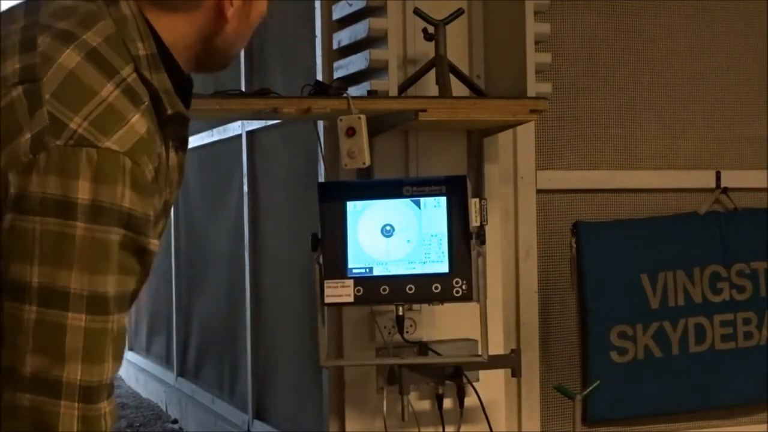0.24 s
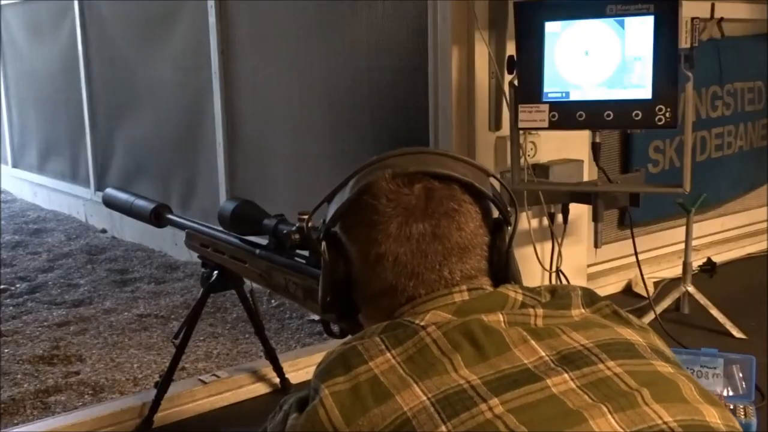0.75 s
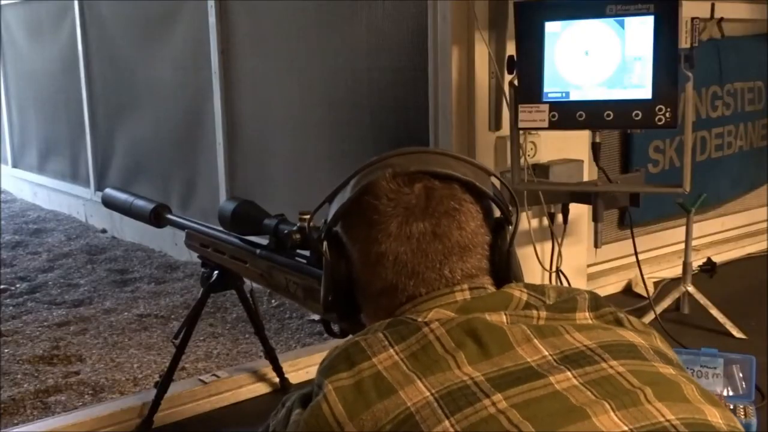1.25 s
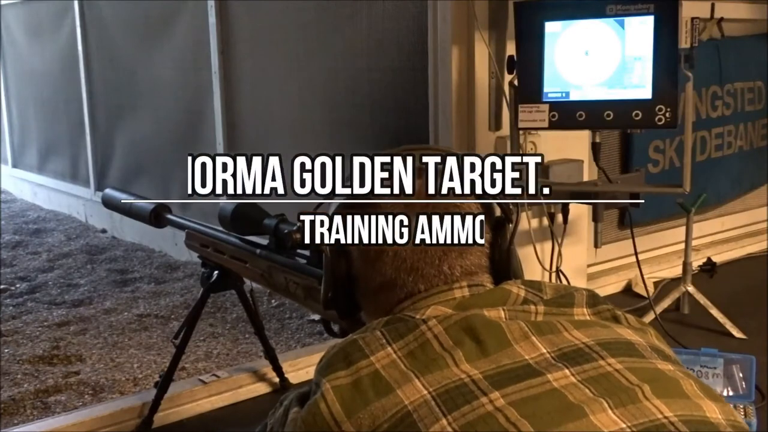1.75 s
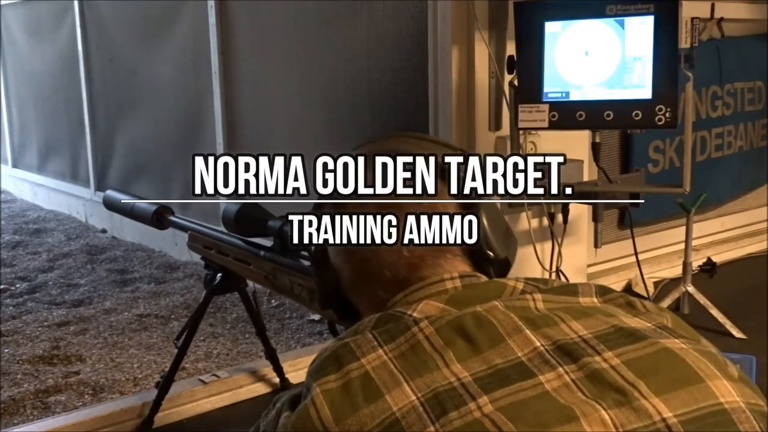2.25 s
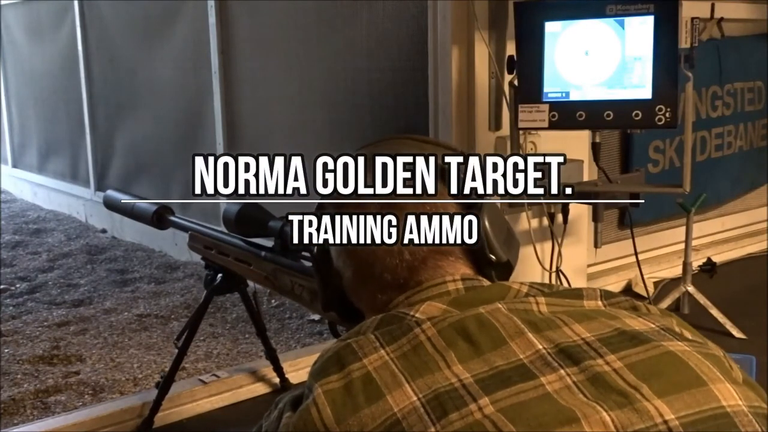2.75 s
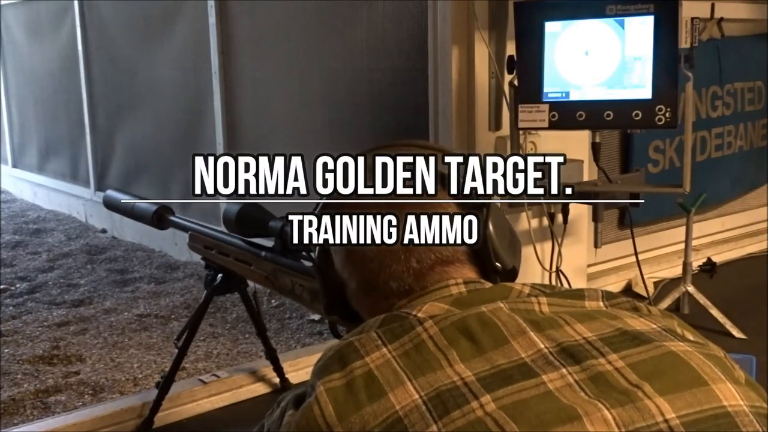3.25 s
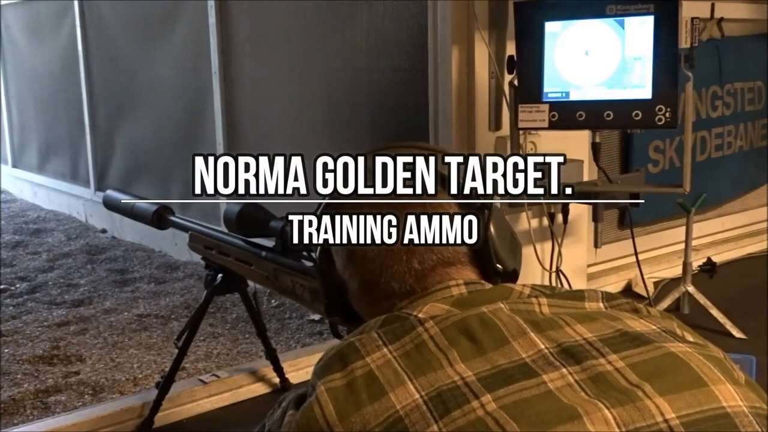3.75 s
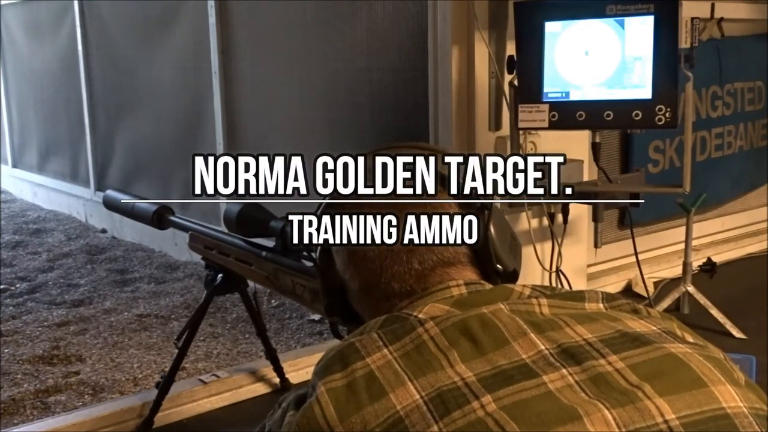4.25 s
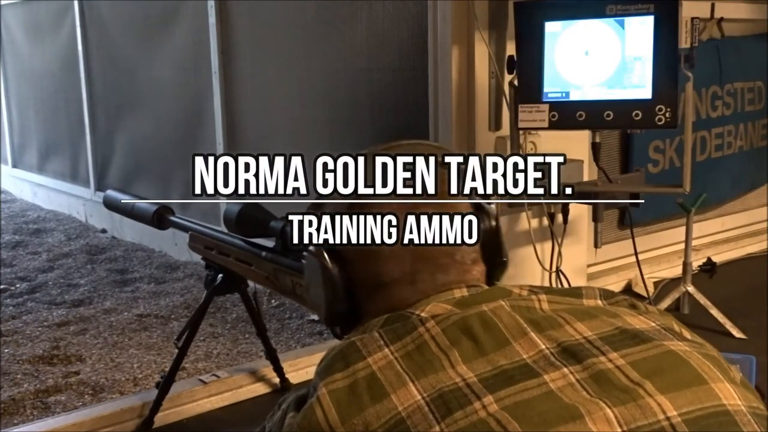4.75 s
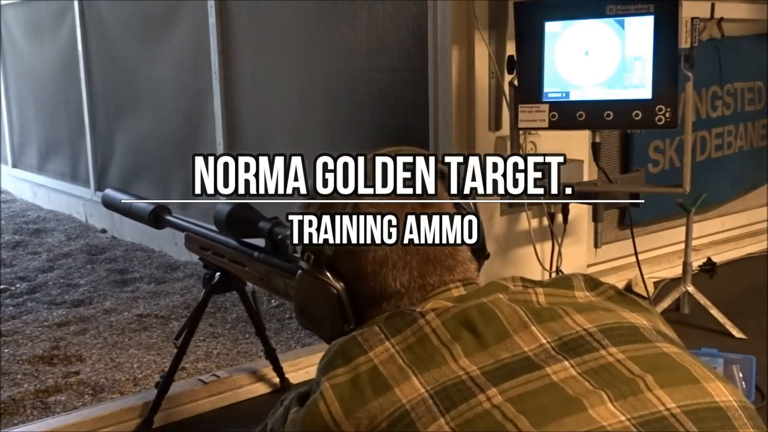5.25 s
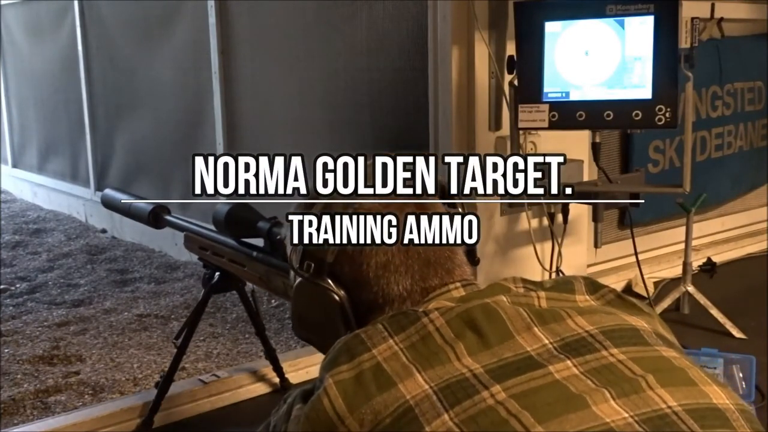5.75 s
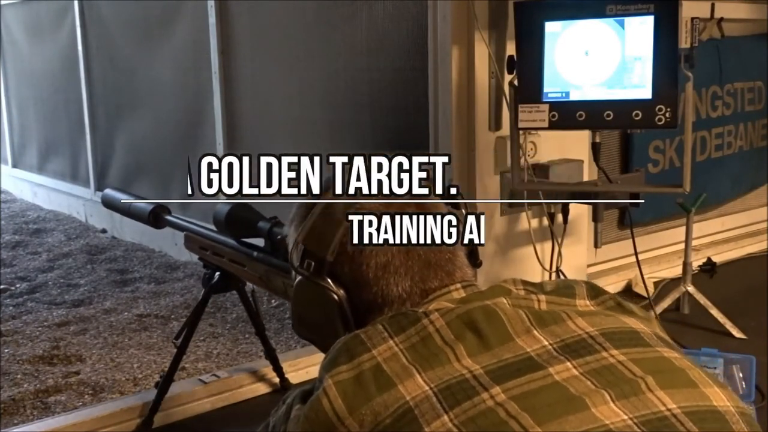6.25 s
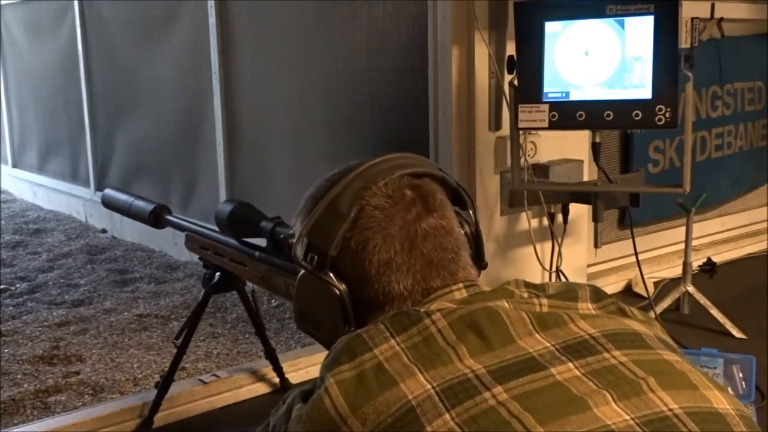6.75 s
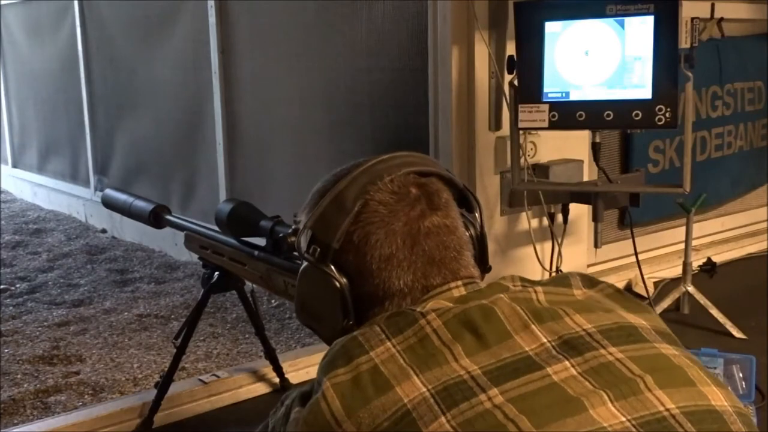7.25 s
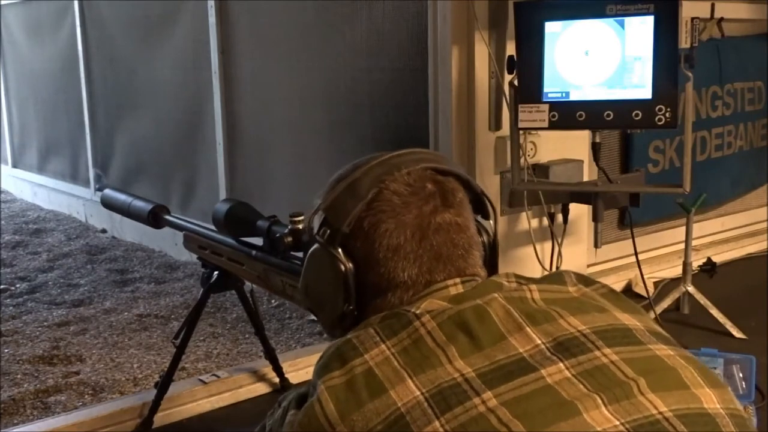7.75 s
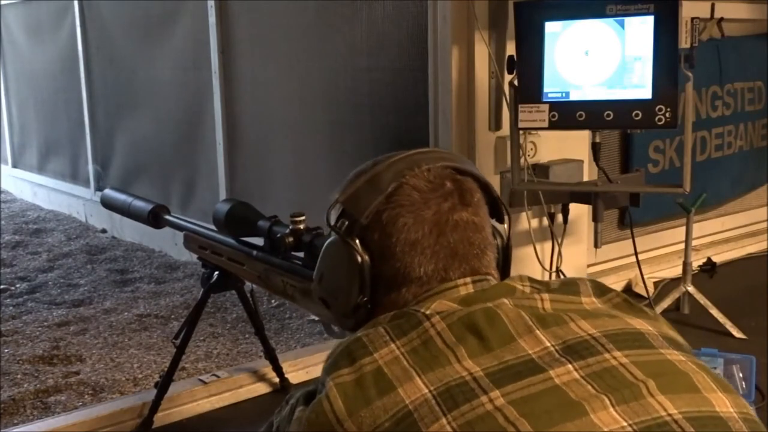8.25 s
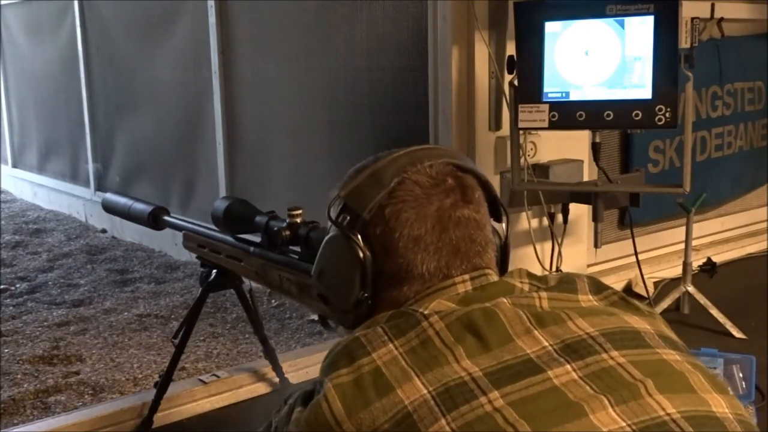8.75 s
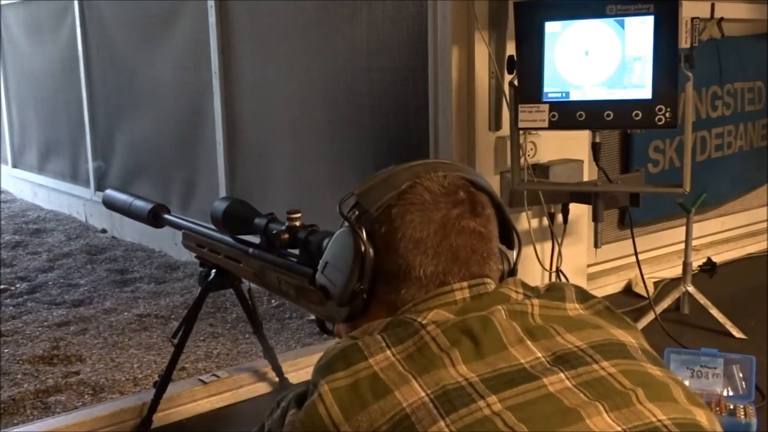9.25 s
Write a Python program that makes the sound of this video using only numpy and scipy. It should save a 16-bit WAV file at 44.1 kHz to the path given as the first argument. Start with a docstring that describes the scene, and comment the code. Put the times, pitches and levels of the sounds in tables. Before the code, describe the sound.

Sharp metallic clacks and short scrapes of a rifle bolt being closed, then opened and closed again, close up with faint clothing rustle.

```python
"""A shirt rustles over quiet room noise and a soft low flutter, 25 beats a second.
A prone shooter works a bolt-action rifle in a covered firing point, close to a camera. The bolt runs
home and locks; later it is lifted, drawn back with short hollow notes, pushed forward and locked again.
Contacts ring the steel, the stock and the air in the action; sliding friction scrapes and squeals.
On the first closing a brass cartridge rattles in and a jolted spring pings."""
import sys
import numpy as np
from scipy import signal
from scipy.fft import rfft, irfft, next_fast_len
from scipy.io import wavfile
from scipy.ndimage import uniform_filter1d, map_coordinates

SR = 44100
rng = np.random.default_rng(int(sys.argv[2]) if len(sys.argv) > 2 else 0)


def inscribe(sig):
    """Save sig as 16-bit PCM at rate SR to the path in sys.argv[1].

    A 1-D sig is mono; a 2-D sig holds one channel per row.
    Samples are clipped to [-1, 1] before scaling.
    """
    pcm = np.round(np.clip(np.atleast_2d(sig).T, -1, 1) * 32767)
    wavfile.write(sys.argv[1], SR, pcm.astype(np.int16))


N = 418509

# envelope of room noise and flutter: (time [s], level [dB])
BACKGROUND_LEVEL = [(0.0, -49.5), (0.33, -49.5), (0.42, -55), (1.25, -52.5), (1.5, -57.5), (2.9, -58),
                    (5.3, -52.5), (6.6, -50), (9.49, -51)]


def amp(db):
    """Decibels to gain."""
    return 10 ** (np.asarray(db) / 20)


def unit(x):
    """Scale to rms 1."""
    return x / np.sqrt(np.mean(x ** 2) + 1e-20)


def along(points, hz):
    """Interpolate (frequency [Hz], value) points on a log axis."""
    knots_hz, values = np.transpose(points)
    return np.interp(np.log(hz + 1), np.log(knots_hz + 1), values)


def envelope(points):
    """Gain per sample from (time [s], level [dB]) points."""
    return amp(np.interp(np.arange(N) / SR, *np.transpose(points)))


def movement(peak_s, rise_s, hold_s, db, fade_db_per_s, rise_db=29.5):
    """Gain of one movement: swell, hold, fade."""
    t = np.arange(N) / SR - peak_s
    swell_db = rise_db * np.minimum(t, 0) / max(rise_s, .001)
    fade_db = fade_db_per_s * np.maximum(t - hold_s, 0)
    return amp(db + np.maximum(swell_db - fade_db, -200))


def wobble(rate_hz):
    """Smooth random curve, rate_hz knots a second."""
    knots = rng.standard_normal(int(N * rate_hz / SR) + 4)
    return map_coordinates(knots, [np.arange(N) * rate_hz / SR])


def grit(size, spiky_db):
    """Noise broken into tiny contacts of uneven strength."""
    noise = rng.standard_normal(size)
    strength = unit(uniform_filter1d(rng.standard_normal(size), size=40))
    return unit(noise * amp(spiky_db * strength))


def filtered(x, response):
    """Apply response(hz) by FFT."""
    n = x.shape[-1]
    padded = 2 * next_fast_len(n // 2 + 2048)
    return irfft(rfft(x, padded) * response(np.fft.rfftfreq(padded, 1 / SR)), padded)[..., :n]


def causal(gain):
    """Minimum-phase response of this magnitude: rings only after a blow."""
    cepstrum = irfft(np.log(np.maximum(gain, 1e-6)))
    half = len(cepstrum) // 2
    cepstrum[1:half] *= 2
    cepstrum[half + 1:] = 0
    return np.exp(rfft(cepstrum))


def through(drive, colour):
    """Ring a body of magnitude response colour(hz); rms 1."""
    hz = np.fft.rfftfreq(8192, 1 / SR)
    return unit(signal.oaconvolve(drive, irfft(causal(colour(hz))))[:N])


def resonances(modes, hz):
    """Magnitude response of (centre [Hz], width [Hz], level [dB]) modes."""
    power = 0
    for centre_hz, width_hz, db in modes:
        peak = amp(2 * db) / (1 + ((hz - centre_hz) / (width_hz / 2)) ** 2)
        skirt = 1 / (1 + ((hz - centre_hz) / (centre_hz / 2)) ** 2)
        bass_cut = hz ** 2 / (hz ** 2 + (centre_hz / 2) ** 2)
        power += peak * skirt * bass_cut
    return np.sqrt(power)


def shirt(level_db=-1, fade_db_per_s=450):
    """Fibres rub as the shooter shifts."""
    # cloth movements: (time at full speed [s], rise [s], hold [s], level [dB])
    rustles = [(0.0, .01, 0.12, -43.5), (0.2, 0.08, 0.16, -53), (1.947, 0.27, 0.44, -54.5),
               (4.776, 0.33, .2, -52.5), (8.998, 0.69, 0.27, -54.5)]
    # rubbing cloth spectrum: (frequency [Hz], density [dB])
    cloth = [(290, -12), (500, 2), (835, 1), (1210, 1), (1850, -2.5), (3560, -6.5), (7160, -16.5),
             (8860, -20.5), (15000, -69)]
    rub = unit(filtered(grit(N, spiky_db=1), lambda hz: amp(along(cloth, hz))))
    return amp(level_db) * rub * sum(movement(*row, fade_db_per_s) for row in rustles)


def room_noise(level_db=2):
    """Room air, near mono in the bass and wide in the treble."""
    # air spectrum: (frequency [Hz], density [dB])
    spectrum = [(12, -40.5), (20, -13.5), (112, -5), (196, -3.5), (352, -10.5), (452, -13.5), (631, -12.5),
                (686, -14.5), (985, -17.5), (1100, -18.5), (1410, -21), (3000, -25), (6020, -30),
                (11700, -44), (15500, -61.5)]
    # stereo width: (frequency [Hz], side re mid [dB])
    width = [(60, -6), (150, -18), (380, -11.5), (950, -9.5), (2380, -3), (5980, -1.5), (15000, 1.5)]
    mid = filtered(rng.standard_normal(N), lambda hz: amp(along(spectrum, hz)))
    side = filtered(rng.standard_normal(N), lambda hz: amp(along(spectrum, hz) + along(width, hz)))
    return amp(level_db) * envelope(BACKGROUND_LEVEL) * unit(np.array([mid + side, mid - side]))


def flutter(level_db=1, beat_hz=25, first_s=.01407, puff_lag_s=.0035, puff_width_s=.0035, push_share=.72):
    """Soft low beats: each is part identical push, part fresh puff of noise."""
    # beat spectrum: (frequency [Hz], density [dB])
    spectrum = [(30, -34), (70, -4.5), (120, -8.5), (180, 1), (250, -6.5), (350, -6), (450, -20.5),
                (900, -34), (2000, -79)]
    push = np.zeros(N)
    push[np.arange(first_s * SR, N, SR / beat_hz).astype(int)] = 1
    beats = (np.arange(N) / SR - first_s - puff_lag_s) * beat_hz
    offset_s = ((beats + .5) % 1 - .5) / beat_hz
    puff = np.exp(-.5 * (offset_s / puff_width_s) ** 2) * rng.standard_normal(N)
    drive = np.sqrt(push_share) * unit(push) + np.sqrt(1 - push_share) * unit(puff)
    pulses = through(drive, lambda hz: amp(along(spectrum, hz)))
    return amp(level_db) * envelope(BACKGROUND_LEVEL) * pulses


def steel(hz, modes_db=8, bass_cut_hz=950):
    """Dense steel modes, the strongest standing out; small parts radiate little bass."""
    # steel spectrum: (frequency [Hz], density [dB])
    spectrum = [(350, -40.5), (600, -5), (734, 1), (1100, -2), (1500, -4.5), (1720, -5.5), (2600, -3.5),
                (3320, -2.5), (4520, -8), (5460, -12.5), (6420, -17), (8990, -24.5), (15000, -69.5)]
    # receiver and bolt modes: (centre [Hz], width [Hz], level [dB])
    modes = [(1130, 42, -2.5), (1320, 110, -6.5), (1716, 190, -10.5), (2420, 31, -13), (3090, 21, -10),
             (4480, 200, -7.5), (5400, 33, -23.5), (5920, 39, -17.5), (6400, 100, -5), (7150, 180, -24),
             (8100, 200, -14.5), (7700, 150, -3.5), (7500, 15, -14.5), (8690, 50, -29.5), (8900, 28, -19.5)]
    bass_cut = hz ** 2 / (hz ** 2 + bass_cut_hz ** 2)
    return amp(along(spectrum, hz)) * (1 + amp(modes_db) * resonances(modes, hz)) * bass_cut


def mode_ripple(hz, depth_db=3.5, spacing_hz=65, onset_hz=1500):
    """Each contact point excites its own random mix of the small modes above the bass."""
    ripple = map_coordinates(rng.standard_normal(2048), [hz / spacing_hz], mode="mirror")
    return amp(depth_db * ripple * (1 - 1 / (1 + (hz / onset_hz) ** 4)))


def cavity(hz, bass_cut_hz=660):
    """Air in the open action; radiates little below its first resonance."""
    # air modes: (centre [Hz], width [Hz], level [dB])
    modes = [(755, 42, -7), (825, 92, 3.5), (1026, 24, -13.5), (1560, 79, -20.5), (2383, 100, -15),
             (2866, 61, -21)]
    return resonances(modes, hz) * (1 - 1 / (1 + (hz / bass_cut_hz) ** 4))


def contacts(clack_db=-11, body_db=-10, snap_db=-12, split_hz=4800, graze_s=.007, graze_db=-20,
             scatter_db=-15, scatter_t60_s=.13):
    """Parts graze, strike and chatter, ringing the steel, the stock and the air in the action."""
    # contacts: (time [s], level [dB], relative treble [dB], chatter t60 [s], part struck)
    blows = [ (0.6514, -31.5, -14, .03, "receiver"), (0.7073, -22, -9.5, .07, "receiver"),
             (1.0485, -26, -8, 0.13, "bolt"), (1.075, -7.5, -3.5, .12, "lugs"),
             (1.0912, -1.5, -8, .048, "case"), (1.1935, -23, -19, 0.044, "case"),
             (1.26, -29.5, -28, 0.045, "lugs"), (1.284, -20.5, -22, .05, "bolt"),
             (1.3074, -16.5, -5, 0.062, "lugs"), (1.3259, -3.5, -5.5, 0.05, "stop"),
             (1.3586, -9.5, 4, 0.033, "lugs"), (1.3726, -2, -2, .033, "receiver"),
             (1.6598, -14, -27, 0.029, "stock"), (1.6696, -21.5, -8.5, .04, "bolt"),
             (1.7328, -28.5, -47, .037, "stock"), (1.7452, -27.5, -9, 0.062, "bolt"),
             (2.06, -38.5, -16, 0.03, "stock"), (2.8228, -42.5, -4, 0.094, "bolt"),
             (3.548, -27.5, -26, 0.064, "receiver"), (3.9245, -42.5, -27.5, 0.036, "receiver"),
             (3.997, -41.5, -24.5, 0.046, "lugs"), (4.206, -42, -11.5, 0.052, "receiver"),
             (4.3806, -45.5, -19.5, .04, "stock"), (4.5818, -38, -24.5, 0.031, "receiver"),
             (4.5936, -36.5, -11, 0.11, "stop"), (5.179, -35.5, -1, 0.033, "receiver"),
             (5.3506, -22.5, 1, 0.094, "bolt"), (5.532, -24.5, -23, 0.13, "bolt"),
             (5.6165, -26.5, -18, 0.15, "receiver"), (5.681, -25, -16, 0.06, "bolt"),
             (5.7478, -20.5, -11, 0.017, "case"), (5.8345, -3.5, -7.5, 0.036, "stop"),
             (5.8669, -14.5, -15, 0.035, "stop"), (5.8917, -15, -33, 0.02, "stop"),
             (5.913, -13, -17, 0.039, "case"), (5.936, -22, -22, .045, "case"),
             (6.0068, -17.5, -26, 0.074, "case"), (6.3535, -17, -8.5, 0.058, "case"),
             (6.5774, -26, -11.5, 0.049, "bolt"), (6.6128, -17.5, -9, .086, "lugs"),
             (6.6905, -14.5, -4.5, 0.049, "lugs"), (6.7259, -9.5, -8.5, 0.078, "lugs"),
             (6.7521, -3, -4, .1, "bolt"), (6.7621, -5, -23, 0.052, "bolt"),
             (6.7908, -8.5, -14.5, 0.2, "receiver"), (6.8571, -18.5, -5, 0.031, "bolt"),
             (6.8793, -4, -6, 0.054, "lugs"), (7.0737, -26, -20, 0.18, "bolt"),
             (7.1, -25.5, -17, .09, "bolt"), (7.2564, -23.5, 1, 0.055, "bolt"),
             (7.2847, -15, 0, 0.058, "bolt"), (7.2943, -9.5, -10.5, 0.072, "receiver"),
             (7.4521, -4, -9.5, 0.03, "receiver"), (7.4631, -18.5, -1.5, .035, "lugs"),
             (7.6213, -30.5, -18, .05, "receiver"), (8.4303, -35, -6.5, 0.083, "stock"),
             (8.518, -29.5, -12, 0.086, "receiver"), (8.767, -33.5, -12, .1, "receiver")]
    # part struck: (relative thud [dB], relative hollow ring [dB], pitch [Hz], relative part ring [dB])
    parts = {"stock": (5.5, -6, 1188, 2.5), "bolt": (-16, -14.5, 1139.5, -0.5), "stop": (-27, 0, 986, -0.5),
             "receiver": (-13.5, -14.5, 1740, -3.5), "lugs": (-15, -18, 1951, -7),
             "case": (-25, -14.5, 2790, -2)}
    # stock modes: (centre [Hz], width [Hz], level [dB])
    stock_modes = [(255, 67, -9.5), (344, 41, -2.5), (480, 140, -1), (698, 90, -2.5)]
    t = np.arange(8192) / SR - graze_s
    after_s = t.clip(0)
    hz = np.fft.rfftfreq(len(t), 1 / SR)
    low_band = 1 / (1 + (hz / split_hz) ** 8)
    mid_octaves = np.log2(np.clip(hz, 1200, 5000) / 1200)
    top_octaves = np.log2(np.clip(hz, 7000, 14000) / 7000)
    steel_gain = steel(hz)
    stock, hollow = causal(resonances(stock_modes, hz)), causal(cavity(hz))
    graze = amp(graze_db) * (1 + t / graze_s)
    scatter = amp(scatter_db - 60 * after_s / scatter_t60_s)  # off the floor and nearby boards
    out = np.zeros(N + SR)
    for time_s, db, treble_db, t60_s, name in blows:
        thud_db, hollow_db, pitch_hz, ring_db = parts[name]
        chatter = amp(-60 * after_s / t60_s) + scatter
        force = rfft(np.where(t < 0, graze, chatter) * grit(len(t), spiky_db=2))
        metal = steel_gain * mode_ripple(hz)
        # soft contacts lose upper mids; hard ones reach the top octave
        clack = causal(metal * low_band * amp(.41 * (treble_db + 6.5) * mid_octaves))
        snap = causal(metal * (1 - low_band) * amp(.18 * (treble_db + 2.5) * top_octaves))
        part = causal(resonances([(pitch_hz, .1 * pitch_hz, 0)], hz))
        layers = [(stock, thud_db + body_db), (hollow, hollow_db + body_db), (part, ring_db + body_db),
                  (snap, treble_db + snap_db), (clack, clack_db)]
        for response, layer_db in layers:
            ring = irfft(force * response)
            ring /= np.sqrt(np.sum(ring ** 2) / (.0069 * SR))  # energy of 6.9 ms at rms 1
            out[round((time_s - graze_s) * SR):][:len(t)] += amp(db + layer_db) * ring
    return out[:N]


def cartridge(level_db=-1, fade_db_per_s=379):
    """Thin brass chatters brightly into the steel chamber."""
    # rattles: (peak time [s], rise [s], hold [s], level [dB])
    rattles = [(1.071, .04, 0.018, -48), (1.33, 0.042, 0.014, -32.5)]
    # brass modes, applied twice: (centre [Hz], width [Hz], level [dB])
    brass = [(9200, 780, 3.5), (11000, 1100, -3), (12250, 700, -1.5), (14450, 700, -8.5)]
    chatter = through(grit(N, spiky_db=6.5), lambda hz: resonances(brass, hz) ** 2 * mode_ripple(hz))
    return amp(level_db) * chatter * sum(movement(*row, fade_db_per_s) for row in rattles)


def bolt_slides(steel_db=-8.5, raceway_db=-2.5, hollow_db=-11, squeal_db=-4, judder_db=2.5,
                stop_db_per_s=449, hollow_fade_db_per_s=398.5):
    """The bolt judders along its raceway, sounding the steel, the hollow action and a thin squeal."""
    # strokes: (time at full speed [s], rise [s], hold [s], scrape [dB], hollow ring [dB], squeal [dB])
    strokes = [(1.345, .075, 0.029, -19.5, -28.5, -32.5), (5.349, .004, 0.085, -35, -56, -63),
               (5.52, 0.09, 0.096, -52.5, -36, -71), (5.613, 0.033, 0.014, -34, -47, -57),
               (5.73, 0.029, 0.086, -35.5, -45, -41.5), (5.906, 0.09, 0.038, -32, -16, -46),
               (6.005, 0.0072, 0.002, -24, -25.5, -34), (6.356, 0.0035, 0.013, -27, -22.5, -39),
               (6.613, 0.022, 0.12, -31, -23.5, -36), (6.756, 0.0089, 0.0047, -15.5, -28, -14.5),
               (6.862, 0.057, .004, -28.5, -46, -53)]
    # raceway modes: (centre [Hz], width [Hz], level [dB])
    raceway_modes = [(855, 41, -5), (1060, 38, 1), (1576, 40, 0.5), (2050, 51, 0), (2306, 29, -3),
                     (2610, 46, 1.5), (2980, 140, -1.5), (4627, 120, -11.5), (6440, 220, -13.5)]
    # squeal modes, applied twice: (centre [Hz], width [Hz], level [dB])
    squeal_modes = [(6120, 180, 2.5), (6560, 200, 2.5), (6780, 220, -1.5)]
    scrape_gain = sum(movement(*timing, db, stop_db_per_s) for *timing, db, _, _ in strokes)
    hollow_gain = sum(movement(*timing, db, hollow_fade_db_per_s) for *timing, _, db, _ in strokes)
    squeal_gain = sum(movement(*timing, db, stop_db_per_s) for *timing, _, _, db in strokes)
    friction = grit(N, spiky_db=3) * amp(judder_db * wobble(rate_hz=130))
    bolt = amp(steel_db) * through(friction, lambda hz: steel(hz) * mode_ripple(hz))
    raceway = amp(raceway_db) * through(friction, lambda hz: resonances(raceway_modes, hz))
    hollow = amp(hollow_db) * through(friction, cavity)
    squeal = amp(squeal_db) * through(friction, lambda hz: resonances(squeal_modes, hz) ** 2)
    return scrape_gain * (bolt + raceway) + hollow_gain * hollow + squeal_gain * squeal


def spring(phase_step_rad=.022):
    """A small spring rings on unsteadily after a jolt."""
    # jolts: (time [s], level [dB])
    jolts = [(1.329, -36.5), (1.373, -30.5), (1.661, -48)]
    # spring modes: (frequency [Hz], level [dB], t60 [s])
    modes = [(4600, -6, 0.15), (8840, -1.5, 0.24), (9160, -5.5, 0.29), (12100, -18, .11)]
    t, out = np.arange(SR // 2) / SR, np.zeros(N)
    for time_s, db in jolts:
        for hz, mode_db, t60_s in modes:
            phase = 2 * np.pi * hz * t + phase_step_rad * np.cumsum(rng.standard_normal(len(t)))
            out[round(time_s * SR):][:len(t)] += amp(db + mode_db - 60 * t / t60_s) * np.sin(phase)
    return out


def stick_slip(waver_hz=16, flicker_db=4.1, octave_db=-26):
    """Stick-slip locks briefly on to a resonance: a hollow, slightly rough note."""
    # notes: (peak time [s], half length [s], level [dB], pitch [Hz], glide [Hz/s])
    notes = [(4.59, 0.029, -42, 700, 0), (5.946, 0.062, -27, 825, 497), (6.024, .035, -32, 845, 397),
             (6.219, 0.062, -39, 835, 700), (6.392, 0.0706, -29, 827, 501), (6.644, .04, -24, 816, -400),
             (6.702, .03, -26, 803, -200)]
    detune_hz = waver_hz * wobble(rate_hz=200)
    flicker = amp(flicker_db * wobble(rate_hz=160))
    out = np.zeros(N)
    for peak_s, half_s, db, pitch_hz, glide_hz_per_s in notes:
        span = np.arange(round((peak_s - half_s) * SR), round((peak_s + half_s) * SR))
        t = span / SR - peak_s
        phase = 2 * np.pi * np.cumsum(pitch_hz + glide_hz_per_s * t + detune_hz[span]) / SR
        tone = np.sqrt(2) * (np.sin(phase) + amp(octave_db) * np.sin(2 * phase))
        swell = np.cos(np.pi / 2 * t / half_s) ** 4
        out[span] += amp(db) * swell * flicker[span] * tone
    return out


def reverb(x, predelay_samples=400):
    """Tail of the covered firing point; the top dies first."""
    # room decay: (frequency [Hz], t60 [s])
    decay = [(200, .55), (600, 0.31), (2000, 0.3), (6000, 0.33), (12000, 0.23)]
    hz, t, noise = signal.stft(rng.standard_normal(SR * 3 // 4), SR, nperseg=256)
    tail = signal.istft(noise * amp(-60 * t / along(decay, hz)[:, None]), SR, nperseg=256)[1]
    return signal.fftconvolve(x, np.pad(tail / np.linalg.norm(tail), (predelay_samples, 0)))[:N]


def mic_ports(x, max_delay_s=.003):
    """Two close microphone ports agree in the bass and differ in the treble."""
    # stereo width: (frequency [Hz], side re mid [dB])
    width = [(200, -26.5), (600, -42), (2000, -45.5), (4000, -19.5), (8000, -11), (12000, -3)]
    hz = np.fft.rfftfreq(2048, 1 / SR)
    delay_s = max_delay_s * rng.random(len(hz))  # sideways paths: delay varies with frequency
    paths = irfft(np.exp(-2j * np.pi * np.cumsum(delay_s) * hz[1]))[:SR // 50]
    side = filtered(signal.fftconvolve(x, paths)[:N], lambda hz: amp(along(width, hz)))
    return np.array([x + side, x - side])


def scene(reverb_db=-23):
    """Rifle, its reverb and the shirt, over room noise and centred flutter."""
    rifle = contacts() + bolt_slides() + stick_slip() + spring() + cartridge()
    foreground = rifle + amp(reverb_db) * reverb(rifle) + shirt()
    return mic_ports(foreground) + room_noise() + flutter()


def record(dry, rolloff_hz=14000, band_limit_hz=15700):
    """Camera: soft peak clipping, treble roll-off, hard band limit."""
    clipped = dry / (1 + dry ** 6) ** (1 / 6)
    return filtered(clipped, lambda hz: (hz < band_limit_hz) / np.sqrt(1 + (hz / rolloff_hz) ** 16))


dry = scene()
out = record(dry)
inscribe(out)
```